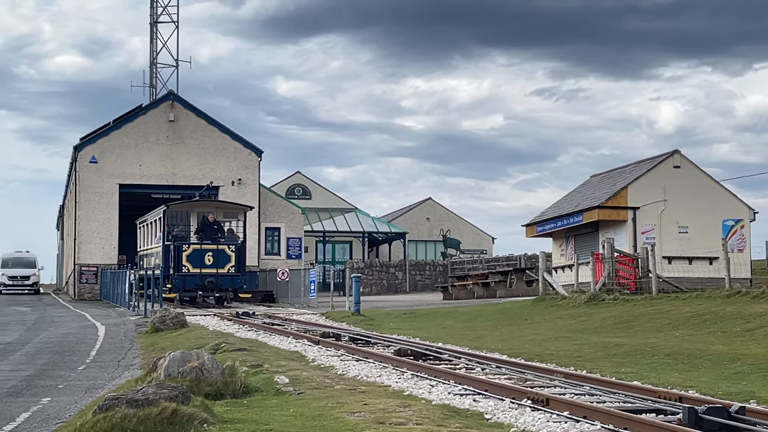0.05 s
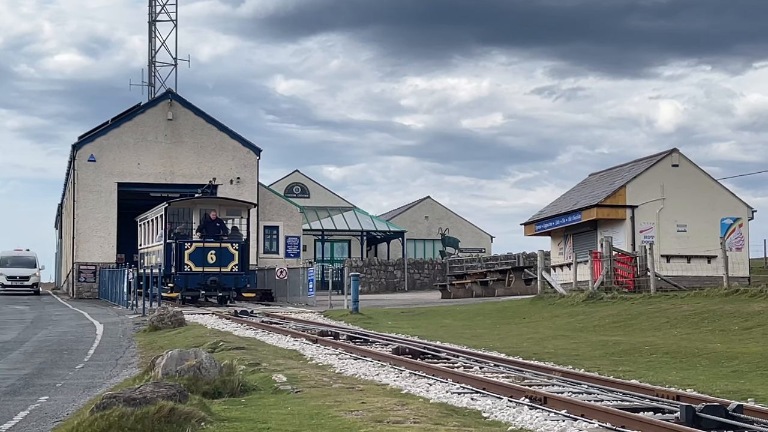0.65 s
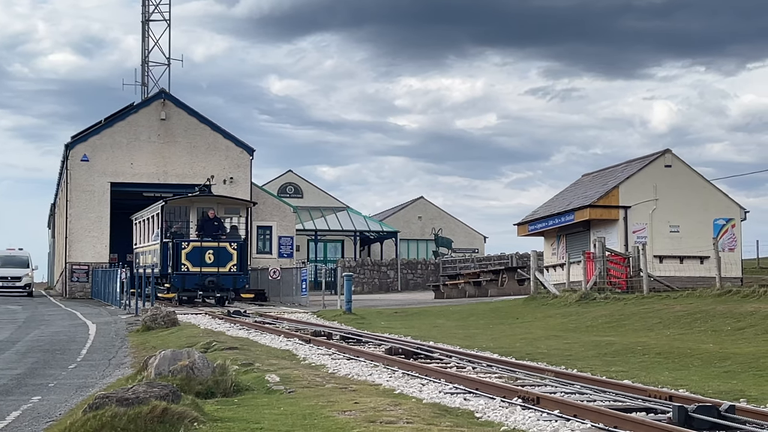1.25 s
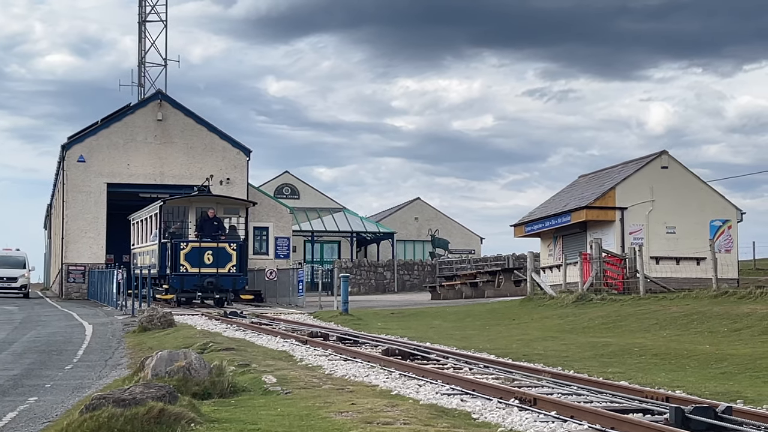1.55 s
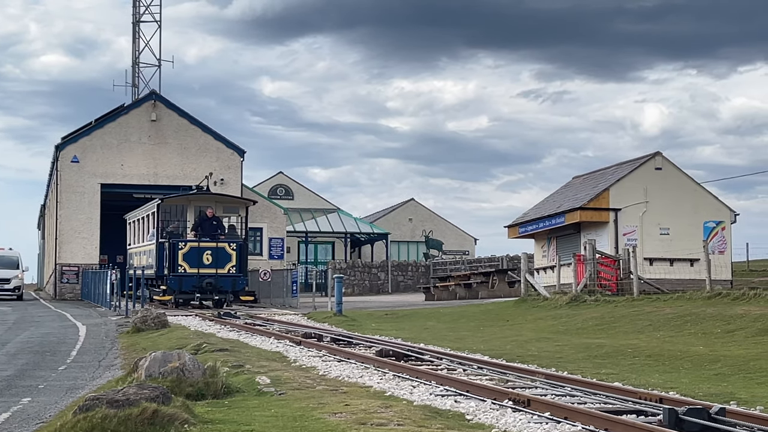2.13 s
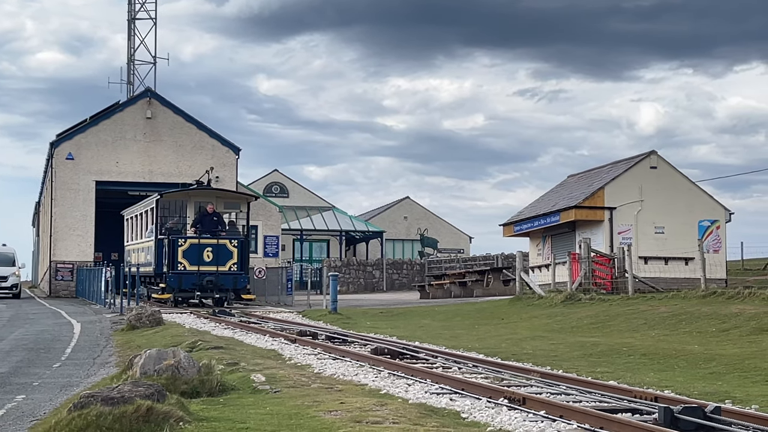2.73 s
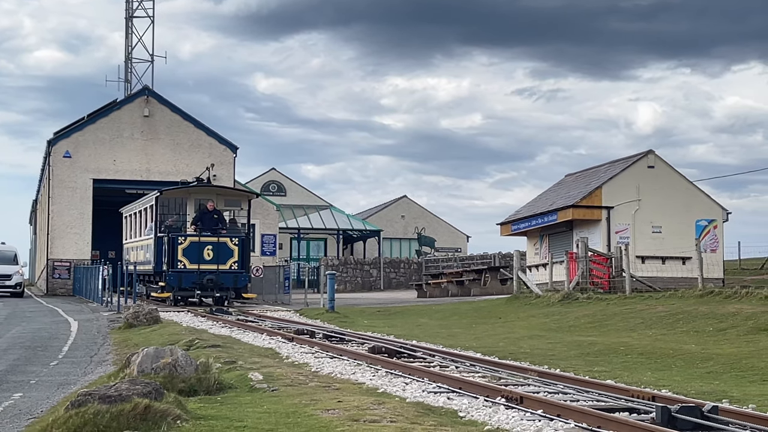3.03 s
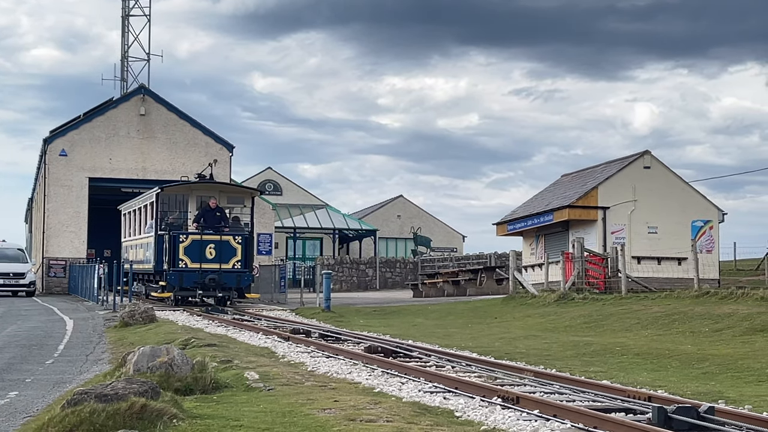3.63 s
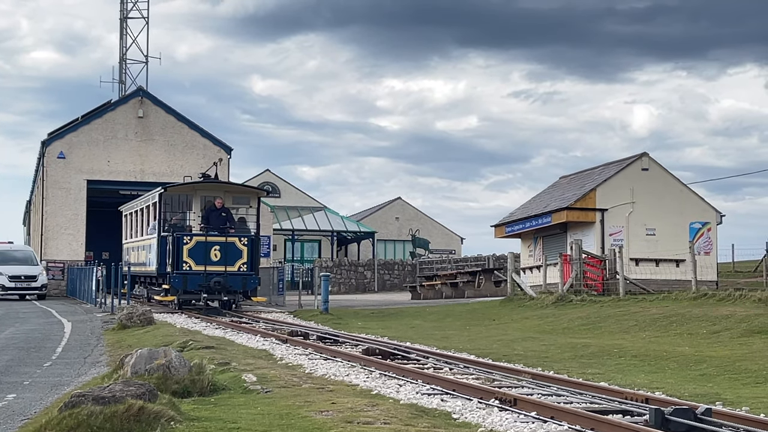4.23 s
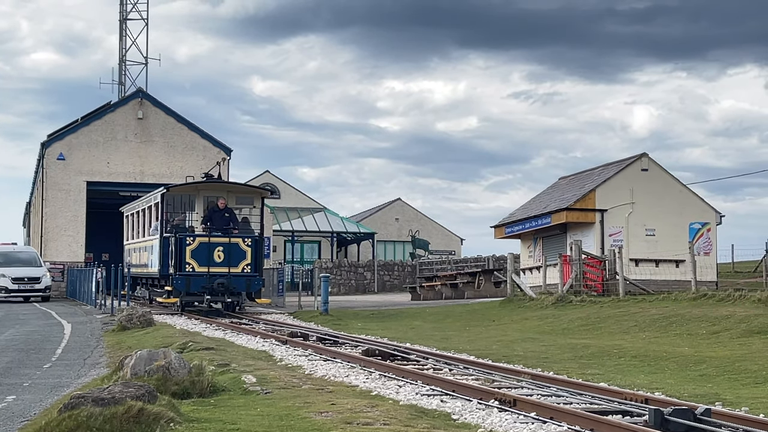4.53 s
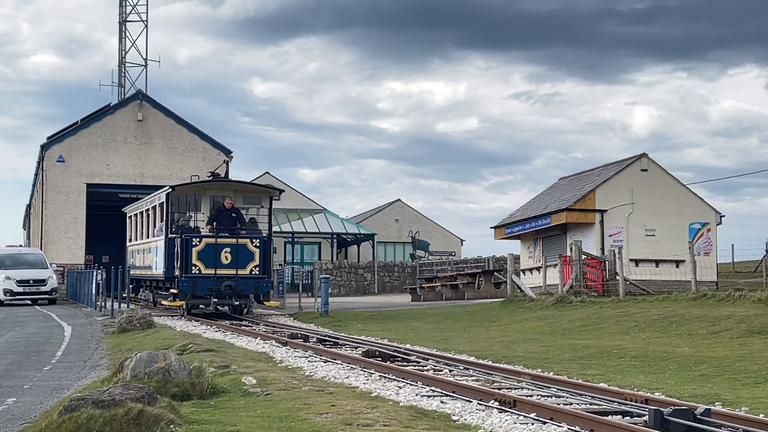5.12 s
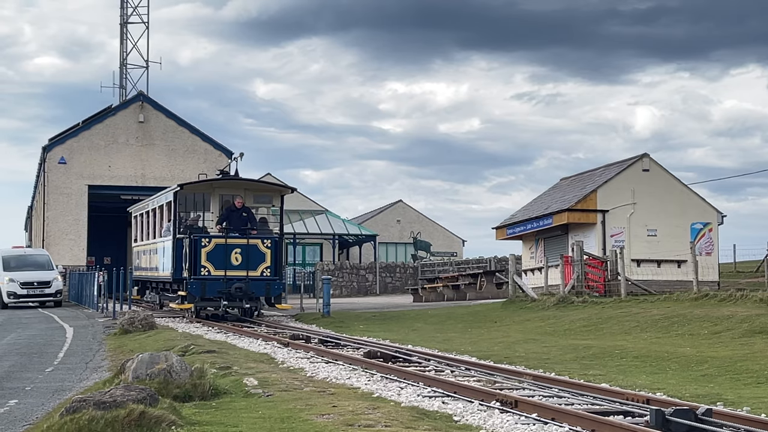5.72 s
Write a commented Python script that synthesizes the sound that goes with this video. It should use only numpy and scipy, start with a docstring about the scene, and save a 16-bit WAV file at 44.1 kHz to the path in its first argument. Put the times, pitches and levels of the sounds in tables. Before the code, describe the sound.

Gusty wind buffets the microphone over the low rumble of a slow cable tram, with a faint steel cable purr and light clinks.

```python
"""Cable tram on a windy hilltop

A cable-hauled tram creeps out of its shed some thirty metres away, wheels rumbling on the rails.
Its haulage cable purrs, hisses and whines over a steel pulley in the track, and clinks as the car
comes nearer. Up front, eddies tumble over the two microphone ports as thumps, flutter and rush;
a faint, wide treble hiss lies under it all."""
import sys
import numpy as np
from scipy import signal
from scipy.fft import rfft, irfft
from scipy.io import wavfile

SR = 44100
rng = np.random.default_rng(int(sys.argv[2]) if len(sys.argv) > 2 else 0)


def persist_wave(psi):
    """Save psi, clipped to +-1, as 16-bit WAV."""
    counts = np.round(np.clip(psi, -1, 1) * 32767).astype(np.int16)
    wavfile.write(sys.argv[1], SR, np.atleast_2d(counts).T)


N = 258867
TIME = np.arange(N) / SR
FREQ = np.fft.rfftfreq(N, 1 / SR)

# faders of the rolling car: t/s, rumble level/dB, wheel drone level/dB
ROLL_LEVELS = [(0, -33.5, -42.5), (1.2, -39.5, -42.5), (1.7, -37, -47), (2.2, -33, -39), (2.55, -48, -36),
               (3.1, -36.5, -37.5), (3.6, -37.5, -46), (4.35, -42.5, -61), (5.1, -38.5, -40),
               (5.87, -36.5, -48.5)]
# tone of the rumble: f/Hz, relative level/dB
RUMBLE_EQ = [(40, 16), (100, 5.5), (300, 2.5), (550, -4), (850, 0.5), (1050, -13), (1400, -33), (2500, -35),
             (5000, -63)]
# resonances of wheels and rail: f/Hz, width/Hz, relative level/dB
WHEEL_MODES = [(534, 86, 1.5), (729, 170, 3), (842.5, 81, 4.5), (980, 113, 1.5), (1122, 94, -6)]

# fader of the pulley's whine: t/s, level/dB
WHINE_LEVEL = [(0, -80), (0.3, -74), (0.7, -68), (1.0, -62), (1.3, -70), (1.9, -71), (2.2, -70), (3.0, -67),
               (3.5, -69), (4.3, -75), (5.87, -59)]
# strands passing the pulley as the cable gathers speed: t/s, rate/Hz
STRAND_RATE = [(0, 58.3), (1, 61.2), (2.5, 63), (4, 64.2), (5.87, 66)]
# fader of the strands' purr: t/s, level/dB
PURR_LEVEL = [(0, -56.5), (0.75, -50), (1.35, -52.5), (2, -51.5), (3, -52), (4, -50.5), (5, -55),
              (5.87, -52.5)]
# broad resonances of the rim under one strand: f/Hz, width/Hz, relative level/dB
RIM_MODES = [(1800, 340, 1), (2394, 143, 7), (2730, 160, 6.5), (3400, 660, -1), (4836, 154, 4.5),
             (5074, 200, 1), (5380, 150, -2), (8745, 82, 4.5)]
# ring of the pulley and its frame: f/Hz, width/Hz, relative level rubbed/dB, relative level struck/dB
PULLEY_MODES = [(2827, 59, 11.5, -2.5), (3640, 36, 6.5, -35), (4640, 90, 4.5, -28), (5058, 32, 11.5, 6),
                (5520, 200, -16, 2), (5700, 24, 11.5, 8.5), (5820, 90, 1, -1.5), (6130, 110, -14, 1.5),
                (6625, 46, 3.5, 1), (7995, 24, 9, 9.5), (8800, 48, -4, -19), (9170, 75, 10.5, -3),
                (11690, 47, 13, 4.5)]
# tone of the running cable's hiss: f/Hz, relative level/dB
CABLE_HISS_EQ = [(1200, -29), (2000, 1.5), (2200, -2.5), (2650, 2), (3050, -4), (4200, -14.5),
                 (6000, -12.5), (7400, -16), (9500, -10.5), (11400, -10), (12500, -31)]
# featured slaps of cable on pulley: t/s, scrape level/dB, scrape decay/s, ring send/dB
CABLE_SLAPS = [(3.478, -30, 0.0016, 0), (3.6616, -25.5, 0.0052, -4), (3.8177, -34, 0.0053, -1),
               (3.994, -34, .003, -6), (4.142, -33, 0.0022, -2), (4.187, -32.5, 0.0059, -0.5),
               (4.3076, -33, 0.0026, -1), (4.4398, -38, .003, -4), (4.461, -29.5, 0.005, 1.5),
               (4.4955, -35, 0.0062, -1), (4.5202, -25, 0.003, -0.5), (4.541, -33, .006, -2),
               (4.571, -29.5, 0.0044, -1), (4.585, -30, .004, -5), (4.6157, -22.5, 0.0023, -3),
               (4.6456, -31, 0.0067, 1), (4.658, -28, 0.0037, -5), (4.684, -33, .005, -4),
               (4.69, -30, .005, -1), (4.703, -33, .003, -3), (4.714, -31.5, .004, -1),
               (4.7735, -37, .003, -5), (4.7967, -28.5, 0.0037, 1.5), (4.835, -35, .003, -3),
               (4.868, -31, .0025, -3), (4.8985, -31, .0025, -7), (4.9336, -35, .004, -4),
               (4.9534, -36, 0.0044, -1), (4.973, -34, 0.0035, 0), (4.9951, -33, 0.0025, -5),
               (5.0344, -35, .004, -7), (5.2951, -31, .002, -5), (5.3115, -32.5, .005, -1),
               (5.5525, -35, .002, -6), (5.588, -31.5, .003, -6), (5.615, -32, 0.0033, -8),
               (5.6518, -29.5, 0.0048, -3), (5.684, -26, 0.014, -3), (5.7506, -35, .004, -9)]
# spells of slack in which the cable chatters: t/s, length/s, level/dB
SLACK_SPELLS = [(4.508, 0.28, -51), (4.822, 0.2, -61), (5.603, 0.12, -50)]

# wind strength, riding the flutter, rush and rasp: t/s, level/dB
WIND_STRENGTH = [(0.0, -51.5), (0.26, -44), (0.38, -39.5), (0.53, -43), (0.82, -46), (0.92, -44),
                 (1.08, -49.5), (1.42, -47.5), (1.55, -44), (2.15, -42.5), (2.32, -48), (2.55, -40),
                 (2.72, -48.5), (3.28, -39), (3.47, -41.5), (4.06, -41), (4.2, -49.5), (4.5, -52.5),
                 (4.67, -44.5), (5.15, -52), (5.31, -46), (5.6, -46.5), (5.87, -45)]
# fader of the deep buffeting: t/s, level/dB
BUFFET_LEVEL = [(0, -29), (0.65, -33.5), (1.2, -34.5), (1.9, -35), (2.15, -29), (2.95, -35.5), (3.35, -28),
                (3.9, -29), (4.18, -25), (4.37, -37), (4.55, -30), (4.85, -23), (5.02, -32.5),
                (5.25, -26.5), (5.58, -36.5), (5.75, -24)]
# the wind's low end, its buffeting: f/Hz, relative level/dB
BUFFET_EQ = [(20, -24), (32, -22), (45, -11), (65, 0.5), (100, -3.5), (150, -7.5), (220, -23), (400, -19.5)]
# the wind's low mids, its flutter: f/Hz, relative level/dB
FLUTTER_EQ = [(90, -77), (170, 6), (250, 1), (350, -3), (520, -2), (750, -5), (1100, -21.5), (2000, -58)]
# the wind's upper mids, its rush: f/Hz, relative level/dB
RUSH_EQ = [(350, -50), (650, -7.5), (900, 6), (1200, 4), (1650, -0.5), (2100, -5), (3000, -36), (6000, -45)]
# soft bumps of single large eddies: t/s, level before trim/dB, f/Hz
PUFFS = [(0.844, -22, 86.1), (1.011, -24, 86.1), (1.217, -16.5, 86.1), (1.318, -24, 86.1),
         (1.353, -23.5, 86.1), (1.484, -34, 169), (1.639, -21, 86.1), (1.786, -18.5, 89),
         (1.835, -19.5, 104), (1.869, -17.5, 115), (2.073, -22, 86.1), (2.127, -22, 84.5),
         (2.22, -19, 96.9), (2.405, -21, 101), (2.93, -24, 93), (3.195, -20, 113), (3.247, -18, 86.1),
         (3.308, -18, 85), (3.35, -18, 186), (3.565, -21, 86.1), (3.722, -21, 86.1), (3.846, -16.5, 85)]
# gusts hitting the microphone: t/s, length/s, slap f/Hz, slap level/dB, thud f/Hz, thud level/dB
GUSTS = [(0.041, 0.01, 366, -16.5, 100, -18.5), (0.068, 0.0087, 655, -20.5, 164, -35),
         (0.113, 0.01, 634, -17.5, 150, -31), (0.146, .022, 940, -21.5, 140, -22.5),
         (0.216, 0.0055, 790, -23.5, 118, -30), (0.178, 0.0069, 480, -21, 200, -39),
         (0.239, 0.003, 750, -15, 170, -21), (0.284, 0.014, 430, -22, 79, -21),
         (0.302, 0.054, 330, -22, 76.4, -13.5), (0.384, .016, 700, -20.5, 265, -19),
         (0.455, 0.016, 794, -21.5, 132, -32), (0.629, 0.0055, 640, -19, 192, -27),
         (0.735, 0.0089, 855, -24, 78, -19.5), (0.891, 0.015, 302, -31, 87, -15),
         (0.923, 0.0026, 920, -21, 131, -22), (1.067, 0.0076, 328, -33, 106, -19.5),
         (1.95, .025, 246, -25, 152, -21), (2.249, 0.028, 317, -23, 72, -16.5),
         (2.427, 0.034, 450, -23, 67.6, -19), (2.475, .014, 640, -19, 148, -20.5),
         (2.576, 0.0042, 272, -24.5, 133, -14.5), (2.686, 0.0071, 300, -24, 99, -25.5),
         (2.735, 0.016, 374, -25.5, 89, -19), (3.365, 0.022, 456, -17, 71.6, -19),
         (3.436, 0.015, 283, -20, 113, -16), (3.721, 0.035, 490, -20.5, 105, -16),
         (3.864, 0.0015, 960, -20, 69.5, -31), (4.014, 0.0049, 1250, -26, 400, -29),
         (4.03, 0.0068, 640, -11, 162, -14.5), (4.046, 0.0046, 520, -20, 157, -12),
         (4.055, 0.0087, 523, -12, 130, -12), (4.068, 0.0058, 480, -12, 200, -16),
         (4.088, 0.0043, 850, -23, 200, -21), (4.131, 0.02, 480, -16, 132, -15.5),
         (4.17, 0.0263, 328, -26, 68, -20), (4.223, 0.0052, 369, -23, 70, -32),
         (4.263, 0.0053, 328, -17, 97, -17), (4.421, 0.025, 198, -30.5, 111, -17),
         (4.523, 0.003, 195, -20, 95, -24), (4.549, 0.0084, 345, -24.5, 85.5, -23),
         (4.665, 0.0075, 795, -18.5, 110, -29), (4.7524, 0.0069, 420, -10, 193, -15),
         (4.774, 0.025, 170, -17, 132, -19), (4.833, 0.0063, 187, -21, 124, -11),
         (4.87, 0.0044, 710, -21, 193, -21), (5.322, 0.0064, 620, -19.5, 121, -24),
         (5.349, 0.0026, 796, -25, 150, -32), (5.413, 0.0046, 696, -16.5, 150, -31),
         (5.435, 0.0077, 635, -19.5, 99, -21.5), (5.517, 0.0027, 594, -22.5, 84.5, -25),
         (5.823, 0.0082, 268, -25.5, 80, -41)]
# a gust's churning body: f/Hz, relative level/dB
CHURN_EQ = [(85, -10), (150, 4.5), (230, 4.5), (330, -3.5), (520, -9.5), (750, -11), (1200, -21),
            (1800, -45)]
# a gust's rasping edge: f/Hz, relative level/dB
RASP_EQ = [(800, 1), (1300, 6), (1900, -7.5), (2600, -5), (4000, -38)]
# phase between the microphone ports: f/Hz, lead of the left/rad
PORT_PHASE = [(2200, 0), (3100, .6), (4400, .45), (5600, .22), (6200, .1), (7500, .05), (8020, .4),
              (8400, .05), (8850, -.1), (9150, -1.1), (9820, -3), (10400, -3.2), (11900, -6.2)]


def undb(db):
    """Decibels to gain."""
    return 10 ** (np.asarray(db) / 20)


def unit(x):
    """Scale to rms 1."""
    return x / np.sqrt(np.mean(x ** 2))


def faders(table):
    """One gain curve per level column of rows t/s, level/dB, ..."""
    times, *columns = np.transpose(table)
    return [undb(np.interp(TIME, times, db)) for db in columns]


def spell(start_s, length_s, rise_s, fall_s):
    """Envelope that swells, holds and dies away."""
    before = np.minimum(TIME - start_s, 0)
    after = np.maximum(TIME - start_s - length_s, 0)
    return np.exp(before / rise_s - after / fall_s)


def eq(points):
    """EQ curve through points f/Hz, level/dB, falling 12 dB an octave beyond both ends."""
    hz, db = np.transpose(points)
    f = FREQ + 1
    ends = np.minimum(np.minimum(f / hz[0], hz[-1] / f), 1) ** 2
    return ends * undb(np.interp(np.log(f), np.log(hz), db))


def high_pass(hz, order):
    """Curve of a smooth low cut."""
    return 1 / np.sqrt(1 + (hz / (FREQ + 1)) ** (2 * order))


def resonance(hz, width_hz):
    """Frequency response of one damped mode."""
    return 1j * FREQ * width_hz / (hz ** 2 - FREQ ** 2 + 1j * FREQ * width_hz)


def shape(x, response):
    """Filter by a frequency response."""
    return irfft(rfft(x) * response, N)


def noise():
    """White noise."""
    return rng.standard_normal(N)


def wander(rate_hz):
    """Smooth random modulation of rms 1."""
    return unit(shape(noise(), np.exp(-(FREQ / rate_hz) ** 2)))


def add(track, start_s, sound):
    """Mix a sound into a track."""
    i = max(int(start_s * SR), 0)
    track[i:i + len(sound)] += sound[:max(N - i, 0)]


def impacts(per_s, spread_db):
    """Random impulses of either sign and uneven size."""
    hits = rng.random(N) < per_s / SR
    return hits * rng.choice([-1, 1], N) * undb(spread_db * noise().clip(-2, 2))


def wide_hiss():
    """A faint, wide treble hiss, opposite in polarity left and right."""
    tone = eq([(1000, 15), (2200, 28), (3500, 25), (5000, -33), (7000, -72), (9500, 5), (11500, 17)])
    hiss = undb(-62.5) * unit(shape(noise(), tone))
    return np.array([hiss, -hiss])


def wheels():
    """Steel wheels rumble and drone on the rails, dulled by distance and wavering in the moving air."""
    rumble_gain, drone_gain = faders(ROLL_LEVELS)
    ring = sum(undb(db) * resonance(hz, width) ** 2 for hz, width, db in WHEEL_MODES)
    rumble = rumble_gain * undb(0.98 * wander(6)) * unit(shape(noise(), eq(RUMBLE_EQ)))
    drone = drone_gain * undb(0.33 * wander(21)) * unit(shape(noise(), ring))
    return rumble + drone


def pulley_whine(pitch_hz=5690, waver_hz=18):
    """The cable keeps one mode of the pulley singing: a thin, wavering whine."""
    phase = 2 * np.pi * np.cumsum(pitch_hz + waver_hz * wander(36.4)) / SR
    return faders(WHINE_LEVEL)[0] * unit(undb(2 * wander(8.5)) * np.sin(phase))


def strand_purr(scrape_s=0.0023):
    """Each twisted strand knocks once on the rim: a purr that swells and fades with the cable's sway."""
    rate_hz = np.interp(TIME, *np.transpose(STRAND_RATE))
    strands_passed = np.cumsum(rate_hz * (1 + .015 * wander(25))) / SR
    onsets = np.flatnonzero(np.diff(np.floor(strands_passed)))
    knocks = np.zeros(N)
    knocks[onsets] = rng.uniform(.45, 1, len(onsets))
    knocks *= undb(1.2 * wander(7).clip(-2, 1))
    # a knock drags on as a brief scrape, so each one has its own colour
    tails = signal.lfilter([1], [1, -np.exp(-1 / (scrape_s * SR))], knocks)
    knocks += undb(-15) * noise() * tails
    rim = sum(undb(db) * resonance(hz, width) * (-1) ** k for k, (hz, width, db) in enumerate(RIM_MODES))
    return faders(PURR_LEVEL)[0] * unit(shape(knocks, rim * high_pass(1050, order=2)))


def pulley(struck, direct_db, damping_hz=0):
    """Response of the pulley's modes, rubbed or struck, with some dry contact blended in."""
    modes = sum(undb(hit_db if struck else rub_db) * resonance(hz, width + damping_hz) * (-1) ** k
                for k, (hz, width, rub_db, hit_db) in enumerate(PULLEY_MODES))
    return modes * high_pass(2100, order=2) + undb(direct_db) * high_pass(3300, order=4)


def cable_rub():
    """The running cable rubs the pulley with an uneven grip: a steely ring and a broad hiss."""
    grip = undb(1.9 * wander(70) + .9 * wander(6))
    ring = undb(-54) * unit(shape(noise() * grip, pulley(struck=False, direct_db=-38)))
    hiss = undb(-49.5) * unit(shape(noise() * grip, eq(CABLE_HISS_EQ)))
    return ring + hiss


def cable_clinks(grit_db=4, ring_boost_db=6, stray_end_db=-56, stray_db_per_s=1.5):
    """Slack cable slaps and chatters on the pulley; stray clinks grow as the car comes nearer."""
    snaps, rings = np.zeros((2, N))
    age = np.arange(SR // 20) / SR
    for start_s, db, decay_s, ring_db in CABLE_SLAPS:
        wires, grit = rng.standard_normal((2, len(age)))
        scrape = undb(db) * unit(wires * undb(grit_db * grit.clip(-2, 2))) * np.exp(-age / decay_s)
        add(snaps, start_s, scrape)
        add(rings, start_s, undb(ring_boost_db + ring_db) * scrape)
    # the rim gives a dry snap while the cable presses on it, and rings when the cable lifts off
    pressed = undb(-6) * pulley(struck=True, direct_db=-12, damping_hz=220)
    free = pulley(struck=True, direct_db=-13.5)
    slaps = shape(snaps, pressed) + shape(rings, free)
    slack = sum(undb(db) * spell(start_s, length_s, rise_s=0.038, fall_s=0.039)
                for start_s, length_s, db in SLACK_SPELLS)
    chatter = slack * unit(shape(impacts(per_s=400, spread_db=5), free))
    approach = undb(stray_end_db + stray_db_per_s * (TIME - TIME[-1]))
    strays = approach * unit(shape(impacts(per_s=40, spread_db=3), free + pressed))
    return slaps + chatter + strays


def eddy(hz, cycles=1.18, sweep=2.52):
    """One eddy: a few pressure swings that slow as it passes. Returns pre-roll/s and the wave."""
    t = np.arange(int(-2.1 * SR / hz), int(5 * SR / hz)) / SR
    turns = sweep * np.log(np.maximum(1 + hz * t / sweep, 1e-3))
    envelope = np.exp(-(turns / cycles) ** 2)
    return -t[0], envelope * np.cos(2 * np.pi * (turns + rng.random()))


def turbulence(tone, density, spread_db):
    """A swarm of eddies under one EQ; density counts eddies per cycle, so small ones come more often."""
    swarm = np.zeros(N)
    for hz in 50 * 2 ** np.arange(0, 6, 2 / 3):
        if tone[0][0] < hz < tone[-1][0]:
            arrivals = impacts(density * hz, spread_db)
            _, wave = eddy(hz)
            swarm += np.sqrt(hz) * unit(signal.oaconvolve(arrivals, wave, "same"))
    return unit(shape(swarm, eq(tone)))


def puffs(trim_db=-4):
    """Single large eddies bump softly on the microphone."""
    bumps = np.zeros(N)
    for at_s, db, hz in PUFFS:
        lead_s, wave = eddy(hz, cycles=1.58)
        add(bumps, at_s - lead_s, undb(db + trim_db) * wave)
    return bumps


def gusts(strength, churn_db=-10.5, port_hz=1550):
    """A gust slaps with a small eddy, churns and thuds shut with a large one; strong wind adds rasp."""
    body, churn_gain = np.zeros((2, N))
    for start_s, length_s, slap_hz, slap_db, thud_hz, thud_db in GUSTS:
        lead_s, slap = eddy(slap_hz, cycles=1.33)
        add(body, start_s - lead_s, undb(slap_db) * slap)
        lead_s, thud = eddy(thud_hz, cycles=1.19)
        add(body, start_s + length_s - lead_s, undb(thud_db) * thud)
        envelope = spell(start_s, length_s, rise_s=0.0028, fall_s=0.019)
        churn_gain = np.maximum(churn_gain, undb(slap_db + churn_db) * envelope)
    body += churn_gain * turbulence(CHURN_EQ, density=2.2, spread_db=0.5)
    rasp = undb(-23) * strength * churn_gain * turbulence(RASP_EQ, density=.4, spread_db=-2)
    high_cut = 1 / np.sqrt(1 + (FREQ / port_hz) ** 8)  # eddies smaller than the port average out
    return shape(body, high_cut) + rasp


def wind(breeze_db=-45):
    """Big eddies press on both ports alike; the fine rush varies between them and gives width."""
    strength = faders(WIND_STRENGTH)[0] / undb(breeze_db)  # 1 in an average breeze
    # big eddies break into small ones, so flutter and rush come in bursts together
    breakup = wander(38.6).clip(-2, 1.7)
    flutter_gain = undb(-36) * np.sqrt(strength) * unit(undb(3.23 * breakup))
    rush_gain = undb(-43) * strength * unit(undb(3 * breakup))
    buffet_gain = faders(BUFFET_LEVEL)[0] * unit(undb(2 * wander(4.6)))
    mid = buffet_gain * turbulence(BUFFET_EQ, density=2.5, spread_db=1)
    mid += flutter_gain * turbulence(FLUTTER_EQ, density=.9, spread_db=2)
    mid += rush_gain * turbulence(RUSH_EQ, density=.6, spread_db=2.5)
    mid += gusts(strength) + puffs()
    fine_rush = shape(turbulence(RUSH_EQ, density=.6, spread_db=-4), high_pass(930, order=6))
    side = undb(0.9) * rush_gain * fine_rush
    return mid + np.array([side, -side])


def scene():
    """The mix: wide hiss and close wind, with the tram and its cable in the centre."""
    return wide_hiss() + wind() + wheels() + cable_rub() + cable_clinks() + pulley_whine() + strand_purr()


def record(dry):
    """The two microphone ports fall out of step in the treble; a steep high cut takes off the top."""
    lead = np.interp(FREQ, *np.transpose(PORT_PHASE))
    ports = shape(dry, np.exp(1j * np.array([lead, -lead]) / 2))
    high_cut = signal.ellip(8, .2, 70, 12050, fs=SR, output="sos")
    return signal.sosfilt(high_cut, ports)


dry = scene()
out = record(dry)
persist_wave(out)
```